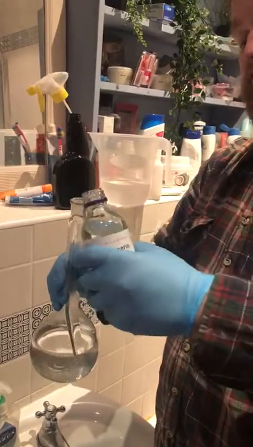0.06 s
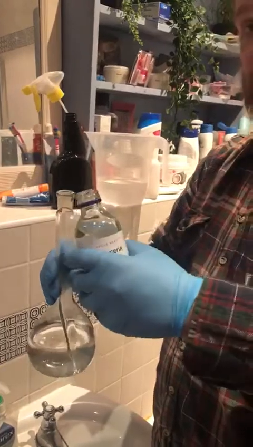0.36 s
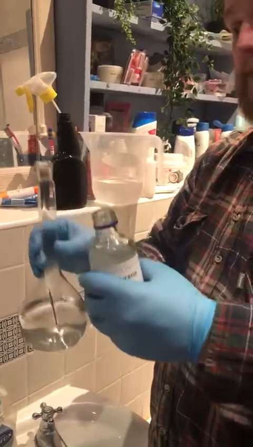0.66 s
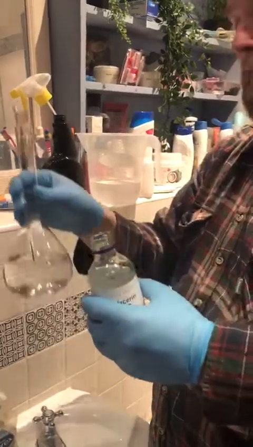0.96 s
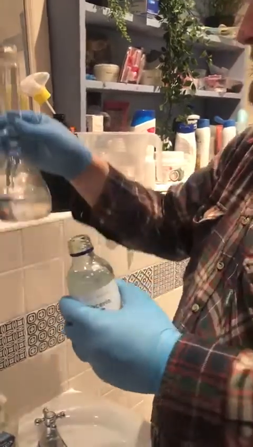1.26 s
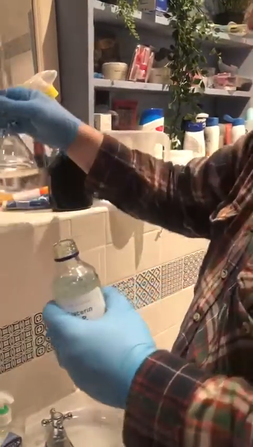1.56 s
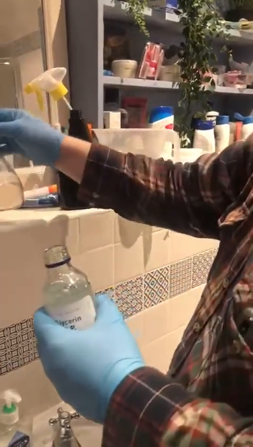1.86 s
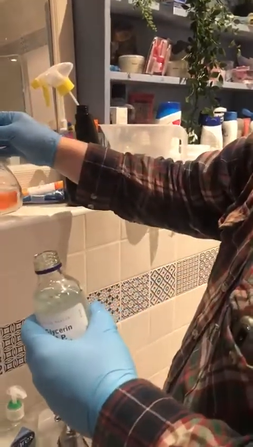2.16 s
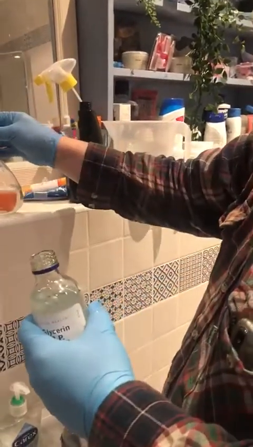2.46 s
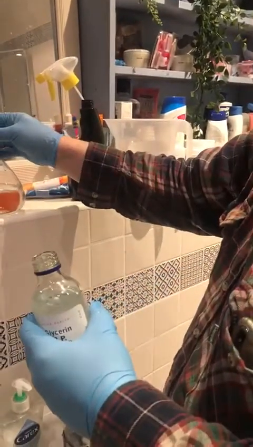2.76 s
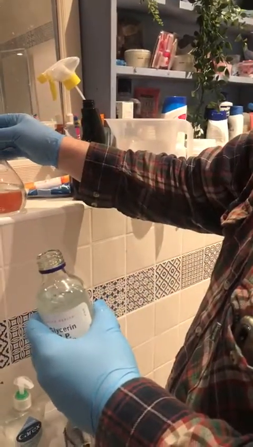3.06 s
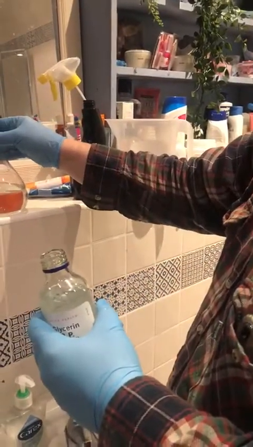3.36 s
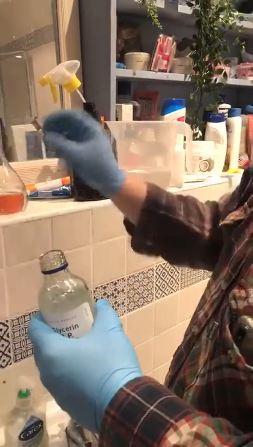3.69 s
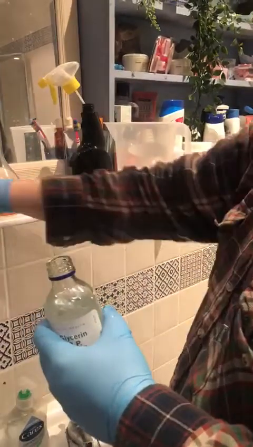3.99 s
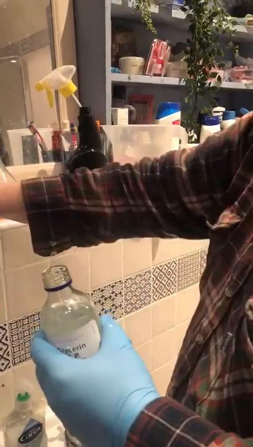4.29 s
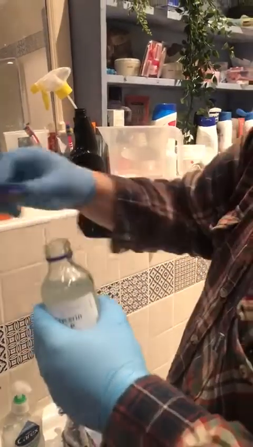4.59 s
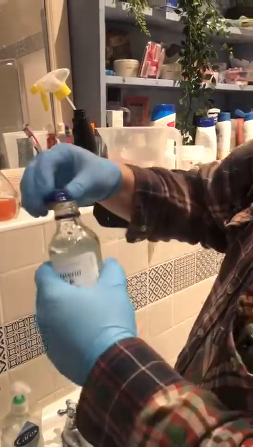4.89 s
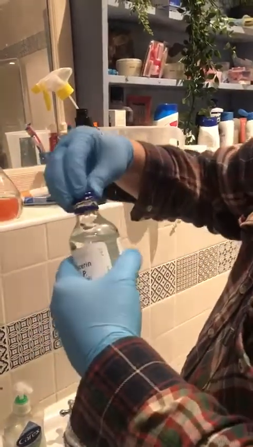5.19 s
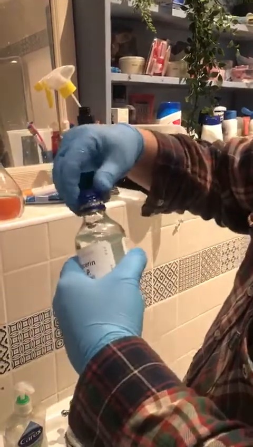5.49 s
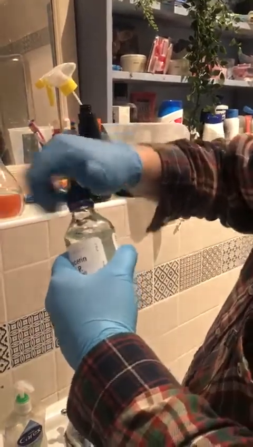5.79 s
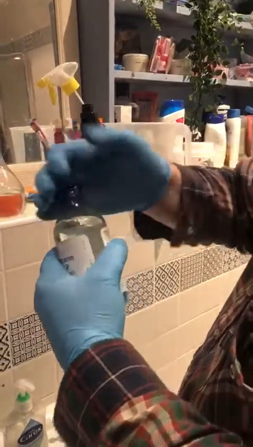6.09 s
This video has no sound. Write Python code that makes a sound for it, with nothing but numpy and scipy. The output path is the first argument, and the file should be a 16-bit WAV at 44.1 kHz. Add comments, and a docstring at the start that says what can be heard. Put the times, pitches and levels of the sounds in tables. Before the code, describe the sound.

A glass flask clinks against a bottle and knocks onto a ledge, then a plastic cap is screwed on in a small bathroom.

```python
"""In a small tiled bathroom, a glass flask clinks against a bottle as gloved hands part them.
A rubber glove squeaks on the glass. The flask is stood on a hollow ledge and rocks to rest with
dull knocks. A plastic cap clicks onto the bottle and scrapes along its thread as it is screwed down.
Gloves and sleeves rustle, the tiles add a short echo, and a low hum lies under it all."""
import sys
import numpy as np
from scipy import signal
from scipy.fft import rfft, irfft, next_fast_len
from scipy.io import wavfile
from scipy.ndimage import uniform_filter1d

SR = 44100
rng = np.random.default_rng(int(sys.argv[2]) if len(sys.argv) > 2 else 0)


def store_pcm(level_fs):
    """Save levels as 16-bit WAV."""
    pcm = np.round(np.clip(level_fs, -1, 1) * 32767).astype(np.int16)
    wavfile.write(sys.argv[1], SR, np.atleast_2d(pcm).T)


N = 275315
EVENT_SAMPLES = 24576  # space for one short sound
EVENT_TIME, SCENE_TIME = np.arange(EVENT_SAMPLES) / SR, np.arange(N) / SR

# Tones of the flask held by its neck: pitch_hz, ring_s, struck_high_db, struck_low_db
# (ring_s is always the time a sound takes to fade by 60 dB)
FLASK_TONES = [(1413, 0.061, -19.5, -14), (1856, 0.0091, -28.5, -2), (1959, 0.13, -36, 0.5),
               (2013, 0.33, -27.5, 2), (2033, 0.071, -11.5, 3), (2876, .02, -23, -19),
               (3586, 0.06, -10, -16.5), (4250, 0.019, -21, -12), (4976, 0.037, 2, -16.5),
               (5364, 0.17, -22.5, -30.5), (5130, 0.037, -18, -32.5), (5730, 0.081, -15.5, -30),
               (6060, 0.066, -19.5, -11.5), (6240, 0.0051, -45, -7), (6780, 0.05, -45, -7),
               (7730, .025, -25.5, -23.5), (8790, 0.023, -29.5, -25.5)]
# Flask hitting the bottle: start_s, level_db, height (0 is low, 1 is high), crack_db, room_db
CLINKS = [(0.0, -54.5, 0.62, -9, -7), (.009, -53, 0.6, -11.5, 4), (0.1109, -31.5, 0.95, -13, -5.5),
          (0.1577, -30.5, 0.06, -9.5, -7)]
# Sharp crack of glass on glass: frequency_hz, level_db
CRACK_SPECTRUM = [(40, -35.5), (150, -0.5), (300, -5), (850, -0.5), (1400, 1), (2500, 0.5), (4500, -6),
                  (7000, -18), (9000, -11.5), (12000, -25.5)]
# Tones of the ledge with the flask on it: pitch_hz, level_db, ring_s
LEDGE_TONES = [(199.7, -22.5, 0.47), (298.2, 3.5, 0.18), (354.7, -13, 0.29), (449, -20, 0.44),
               (529, -25, 0.23), (636, -18, 0.36), (833, -19.5, 0.38), (946, -16.5, 0.47),
               (1552, -19, 0.16), (1710, -47, 0.39), (2000, -13.5, 0.21), (2470, -25, .2),
               (3546, -15.5, 0.16), (4520, -41, 0.1), (5050, -28, 0.19), (5410, -24, 0.09),
               (6030, -30, 0.12), (6700, -24, 0.079), (7700, -33, 0.25), (8608, -38, 0.18)]
# Thud of the ledge: frequency_hz, level_db
THUD_SPECTRUM = [(50, -51), (150, -5.5), (230, 4.5), (390, 2.5), (550, 5), (1000, -3.5), (1270, -10),
                 (1550, -4), (2000, -7.5), (2600, -12), (3100, -23), (4200, -19.5), (5700, -26),
                 (6800, -20.5), (9000, -50), (12000, -57)]
# Flask landing and rocking: start_s, ring_db, thud_db, tick_db, dull_above_hz, contact_s
KNOCKS = [(2.6219, -34.5, -37.5, -63.5, 10900, 0.0061), (2.9218, -44.5, -58.5, -63, 1180, 0.0027),
          (2.9441, -77, -45.5, -77, 3860, 0.007), (2.953, -37.5, -47.5, -78.5, 890, 0.0067),
          (3.1891, -61, -54, -98, 720, 0.0053)]
# Cap hitting the bottle neck: start_s, level_db, grit_db, ring_db
CAP_CLICKS = [(4.8732, -49.5, -26, -10), (5.001, -54, -1, -17), (5.0316, -55, 16.5, 8.5),
              (5.224, -76, 11, -6), (5.2905, -90, 11, -6), (5.9333, -62.5, -5, -6)]
# Snap of the cap: frequency_hz, level_db
SNAP_SPECTRUM = [(100, -50), (1650, -17.5), (2500, 2), (3200, 2.5), (4650, 3), (5200, -11.5), (6700, -12),
                 (7700, -24), (12000, -31)]
# Tones of the cap and bottle neck: pitch_hz, level_db, ring_s
CAP_TONES = [(2360, -9, 0.043), (2820, 5, 0.006), (3105, 0, 0.088), (4180, -9, 0.033), (4540, 4.5, 0.053),
             (6620, -7, 0.024)]
# Air ringing under the cap, lower and shorter as it closes: start_s, level_db, pitch_hz, ring_s
CAP_AIR_TONES = [(4.873, -64, 869, 0.15), (5.003, -61, 724, 0.017), (5.313, -62.5, 516, 0.011)]
# Turns of the cap: start_s, length_s, level_db
TWISTS = [(5.27, 0.085, -62), (5.397, 0.075, -61.5), (5.53, 0.41, -60), (5.9, 0.089, -66)]
# Scrape of the thread: frequency_hz, level_db
THREAD_SPECTRUM = [(40, -23), (130, -2), (300, -3), (750, 0), (1500, -2), (2200, -2.5), (3600, -8.5),
                   (4450, -10.5), (5200, -10.5), (8000, -12), (12000, -17)]
# Glove squeaking on glass: start_s, length_s, level_db, pitch_hz
SQUEAKS = [(0.384, 0.11, -53.5, 1630), (0.41, 0.025, -50, 1622), (.441, 0.024, -51.5, 1628),
           (3.599, 0.0071, -77.5, 1740), (4.218, 0.035, -72.5, 1280)]
# Soft bumps of hands and liquid: start_s, level_db, pitch_hz, fade_s
BUMPS = [(0.193, -53, 263, 0.068), (0.25, -56.5, 325, 0.059), (.285, -52.5, 282, 0.0062),
         (.292, -61, 148, 0.02), (0.378, -56, 507, 0.052), (0.413, -56.5, 324, 0.082),
         (5.995, -62, 257, 0.081)]
# Ticks of gloves and the things they touch: start_s, level_db, centre_hz, width_octaves
TICKS = [(.380, -66, 3740, 0.26), (0.619, -74.5, 4130, 0.54), (1.066, -75, 2140, 0.46),
         (1.113, -76, 3000, 1), (3.726, -67.5, 7500, 2.1), (4.0297, -59.5, 2940, 0.56)]
# Gloves sliding on glass and cap: start_s, length_s, level_db
GLOVE_SLIDES = [(-.1, .37, -58), (.6, .35, -76.5), (3.4, .25, -71.5), (3.55, 1, -83), (5.56, 0.44, -67.5),
                (5.91, 0.26, -61.5), (6.065, 0.048, -63.5), (6.18, .14, -63)]
# Rustle of a glove: frequency_hz, level_db
GLOVE_SPECTRUM = [(40, -34.5), (250, 0), (700, -5.5), (1500, -7.5), (3000, -1.5), (5200, 0), (7500, -4.5),
                  (10000, 1), (12000, -5.5)]
# Sleeve brushing as the arm reaches: start_s, length_s, level_db
ARM_REACHES = [(1, 0.94, -75), (3.41, 0.43, -74), (4.185, 0.071, -65), (4.332, 0.036, -66.5),
               (4.62, 0.63, -75.5)]
# Rustle of a sleeve: frequency_hz, level_db
SLEEVE_SPECTRUM = [(300, -9), (800, 5.5), (1300, 4.5), (2300, 2.5), (3200, -3), (5000, -6), (8000, -18),
                   (12000, -34.5)]
# Hush of the room air: frequency_hz, level_db
AIR_SPECTRUM = [(15, -53), (25, -23.5), (86, -0.5), (109, 0.5), (124, -17.5), (145, -5), (283, -5),
                (429, -9.5), (475, -14.5), (817, -19.5), (906, -20.5), (1480, -24), (4380, -30.5),
                (7350, -29.5), (12000, -34), (15600, -67), (22000, -120)]
# Tones of the low hum: pitch_hz, level_db
HUM_TONES = [(72, -80.5), (99.7, -75.5), (199, -78), (286, -76)]
# How long the tiled room echoes: frequency_hz, ring_s
ROOM_RING = [(150, 0.53), (500, 0.42), (1400, 0.37), (3700, 0.31), (7000, 0.28), (11000, 0.067)]


def flask_clinks():
    """Glass hits glass. The height of the hit decides which tones ring; the hand soon stops them."""
    out = np.zeros(N)
    hz, ring_s, high_db, low_db = np.transpose(FLASK_TONES)
    for start_s, db, height, crack_db, room_db in CLINKS:
        tone_db = height * high_db + (1 - height) * low_db
        ring = unit_energy(in_room(fading_tones(hz, tone_db, ring_s, rise_s=0.002), room_db))
        crack = in_room(hit(CRACK_SPECTRUM, fade_s=0.0049), room_db + 9)
        add(out, start_s, db, ring + amp(crack_db) * crack)
    return out


def ledge_knocks():
    """The flask meets the ledge with a hollow ring, a thud and a tick of its rim."""
    out = np.zeros(N)
    hz, tone_db, ring_s = np.transpose(LEDGE_TONES)
    thud_hz, thud_shape_db = np.transpose(THUD_SPECTRUM)
    for start_s, ring_db, thud_db, tick_db, dull_hz, contact_s in KNOCKS:
        dulling_db = lambda f: -10 * np.log10(1 + (f / dull_hz) ** 3)
        rise_s = 0.0012 + 5.0 / hz  # low tones take longest to build
        ring = fading_tones(hz, tone_db + dulling_db(hz), ring_s, rise_s)
        add(out, start_s, ring_db, in_room(ring, room_db=-12))
        thud = hit(np.transpose([thud_hz, thud_shape_db + dulling_db(thud_hz)]), contact_s)
        add(out, start_s, thud_db, in_room(thud, room_db=4))
        tick = hit(band(centre_hz=5830, octaves=0.75), fade_s=0.0049)
        add(out, start_s, tick_db, in_room(tick, room_db=0))
    return out


def cap_clicks():
    """The cap snaps against the bottle neck, which rings its shell and the air under it."""
    out = np.zeros(N)
    snap = impact(SNAP_SPECTRUM)
    snap = np.pad(snap, (0, EVENT_SAMPLES - len(snap)))
    ring = unit_energy(fading_tones(*np.transpose(CAP_TONES), rise_s=0.00013).sum(0))
    for start_s, db, grit_db, ring_db in CAP_CLICKS:
        grit = hit(band(centre_hz=8500, octaves=3.3), fade_s=0.0018)  # the edge of the thread
        click = snap + amp(grit_db) * grit + amp(ring_db) * ring
        add(out, start_s, db, in_room(click, room_db=-1))
    for start_s, db, hz, ring_s in CAP_AIR_TONES:
        air_tone = np.sin(2 * np.pi * hz * EVENT_TIME) * amp(-60 * EVENT_TIME / ring_s)
        add(out, start_s, db, in_room(air_tone, room_db=4.5))
    return out


def cap_screwing():
    """The cap scrapes along its thread and keeps catching, which adds a fine rattle."""
    catches_per_s = 100
    twist = pressure(TWISTS, skew=0.59)
    catches = (rng.random(N) < catches_per_s / SR) * amp(-16.5) * rng.standard_normal(N)
    tick = np.sqrt(SR / 20) * impact(band(centre_hz=4450, octaves=0.057))
    rattle = signal.oaconvolve(catches * twist, tick)[:N]
    scrape = rub(twist, THREAD_SPECTRUM, slips_per_s=1300, spread_db=2)
    return scrape + in_room(rattle, room_db=-2)


def glove_squeaks():
    """Rubber sticks and slips on glass: a wavering tone and its octave, with scuffing around both."""
    out = np.zeros(N)
    for start_s, length_s, db, hz in SQUEAKS:
        jitter, low_noise, high_noise = rng.standard_normal((3, EVENT_SAMPLES))
        waver = 0.013 * unit_rms(uniform_filter1d(jitter, 120))
        phase = 2 * np.pi * np.cumsum(hz * (1 + waver)) / SR
        tone = np.sin(phase) + amp(-22) * np.sin(2 * phase)
        scuff = amp(-9.5) * shape_noise(low_noise, band(hz, octaves=0.23))
        rasp = amp(-17.5) * shape_noise(high_noise, band(2 * hz, octaves=0.098))
        add(out, start_s, db, arch(EVENT_TIME / length_s, skew=0.92) * (tone + scuff + rasp))
    return in_room(out, room_db=-0.5)


def soft_bumps():
    """Hands and liquid give soft, low pushes."""
    out = np.zeros(N)
    for start_s, db, hz, fade_s in BUMPS:
        band_hz, band_db = band(hz, octaves=0.63).T
        muffled = np.transpose([band_hz, 2 * band_db])  # twice as steep, to remove the highs
        add(out, start_s, db, in_room(hit(muffled, fade_s), room_db=-1))
    return out


def glove_ticks():
    """Light touches make short snaps with no ring of their own."""
    out = np.zeros(N)
    for start_s, db, hz, octaves in TICKS:
        add(out, start_s, db, in_room(hit(band(hz, octaves), fade_s=0.0026), room_db=-0.5))
    return out


def glove_rustle():
    """Gloves slide over the glass and the cap with a fine hiss."""
    return rub(pressure(GLOVE_SLIDES, skew=0.8), GLOVE_SPECTRUM, slips_per_s=6000, spread_db=2.5)


def sleeve_rustle():
    """A flannel sleeve brushes softly as the arm reaches."""
    return rub(pressure(ARM_REACHES, skew=0.55), SLEEVE_SPECTRUM, slips_per_s=5000, spread_db=5)


def air_and_hum():
    """Still room air with a faint, wavering hum."""
    out = amp(-67) * shape_noise(rng.standard_normal(N), AIR_SPECTRUM)
    points_s = np.linspace(0, SCENE_TIME[-1], 50)
    for hz, db in HUM_TONES:
        drift, swell = (np.interp(SCENE_TIME, points_s, row) for row in rng.standard_normal((2, 50)))
        tone = np.sin(2 * np.pi * hz * SCENE_TIME + 1.7 * drift)
        out += amp(db) * unit_rms((1 + 0.3 * swell) * tone)
    return out


def fading_tones(hz, db, ring_s, rise_s):
    """A struck object rings: one tone per row, each swelling quickly and then dying away."""
    swell = 1 - np.exp(-(EVENT_TIME / np.reshape(rise_s, (-1, 1))) ** 2)
    fade = amp(-60 * EVENT_TIME / ring_s[:, None])
    tones = np.sin(2 * np.pi * hz[:, None] * EVENT_TIME)
    return amp(db)[:, None] * unit_energy(swell * fade * tones)


def impact(spectrum):
    """One clean tap with the given spectrum, its energy packed at the start."""
    log_gain = np.log(amp(look_up(spectrum, abs(np.fft.fftfreq(4096, 1 / SR)))))
    response = np.exp(signal.hilbert(log_gain).conj())
    return unit_energy(np.fft.ifft(response).real[:2048])


def hit(spectrum, fade_s):
    """Two things meet in a dying flurry of tiny taps."""
    flurry = rng.standard_normal(EVENT_SAMPLES) * np.exp(-EVENT_TIME / fade_s)
    return unit_energy(signal.fftconvolve(flurry, impact(spectrum))[:EVENT_SAMPLES])


def rub(press, spectrum, slips_per_s, spread_db):
    """Rubbing is many tiny slips of uneven size, louder when pressed harder."""
    slips = (rng.random(N) < slips_per_s / SR) * rng.standard_normal(N)
    slips *= amp(spread_db * np.minimum(rng.exponential(1, N), 4))
    return in_room(shape_noise(slips, spectrum) * press, room_db=0)


def arch(progress, skew):
    """Hand pressure rises and falls as progress goes from 0 to 1; a skew below 1 peaks earlier."""
    return abs(np.sin(np.pi * np.clip(progress, 0, 1) ** skew)) ** 0.99


def pressure(strokes, skew):
    """Pressure over the whole scene, one arch for each stroke."""
    times = SCENE_TIME[::32]
    arches = sum(amp(db) * arch((times - start_s) / length_s, skew) for start_s, length_s, db in strokes)
    return np.interp(SCENE_TIME, times, arches)


def tile_echoes():
    """Sound bounces between close tiled walls; the highs die first."""
    hz, times, noise = signal.stft(rng.standard_normal(EVENT_SAMPLES), SR, nperseg=256)
    fade = amp(-60 * times / look_up(ROOM_RING, hz)[:, None])
    tail = signal.istft(noise * fade, SR, nperseg=256)[1][:EVENT_SAMPLES]
    build_up = 1 - np.exp(-(EVENT_TIME / 0.0041) ** 2)
    return unit_energy(tail * build_up)


def in_room(sound, room_db):
    """Mixes each row of a sound with its echo, room_db louder than the row itself."""
    rows = np.atleast_2d(sound)
    echo = signal.fftconvolve(rows, tile_echoes()[None], axes=1)[:, :rows.shape[1]]
    echo = unit_energy(echo) * np.linalg.norm(rows, axis=1, keepdims=True)
    return (rows + amp(room_db) * echo).sum(0) / np.hypot(1, amp(room_db))


def band(centre_hz, octaves):
    """A spectrum shaped like a rounded hill."""
    hz = np.geomspace(30, 16000, 120)
    return np.transpose([hz, -20 * np.log10(1 + (np.log2(hz / centre_hz) / octaves) ** 2 / 2)])


def shape_noise(noise, spectrum):
    """Gives noise a spectrum (its balance of lows and highs) and an average level of one."""
    size = next_fast_len(len(noise))
    gain = amp(look_up(spectrum, np.fft.rfftfreq(size, 1 / SR)))
    return unit_rms(irfft(rfft(noise, size) * gain, size)[:len(noise)])


def look_up(table, hz):
    """Reads between the rows of a table, with octaves evenly spaced."""
    table_hz, values = np.transpose(table)
    return np.interp(np.log(hz + 1), np.log(table_hz), values)


def add(mix, start_s, db, sound):
    """Places a sound in the mix; db is its level as if it lasted a twentieth of a second."""
    part = mix[round(start_s * SR):][:len(sound)]
    part += (amp(db) * np.sqrt(SR / 20) * unit_energy(sound))[:len(part)]


def amp(db):
    """Turns decibels into a multiplier."""
    return 10 ** (np.asarray(db) / 20)


def unit_energy(sound):
    """Scales each row to an energy of one."""
    return sound / np.sqrt(np.sum(sound ** 2, axis=-1, keepdims=True) + 1e-30)


def unit_rms(sound):
    """Scales to an average level (rms) of one."""
    return unit_energy(sound) * np.sqrt(len(sound))


def scene():
    """Glass, cap, gloves and sleeves over the air of the room, in one channel."""
    rustle = glove_rustle() + sleeve_rustle()
    handling = flask_clinks() + glove_squeaks() + soft_bumps() + ledge_knocks() + glove_ticks()
    cap = cap_clicks() + cap_screwing()
    return (handling + cap + rustle + air_and_hum())[None]


def record(dry):
    """Cuts away the very highest sounds."""
    cutoff_hz = 12050
    low_pass = signal.firwin(301, cutoff_hz, window=("kaiser", 8), fs=SR)
    return signal.oaconvolve(dry, low_pass[None], "same")


dry = scene()
out = record(dry)
store_pcm(out)
```